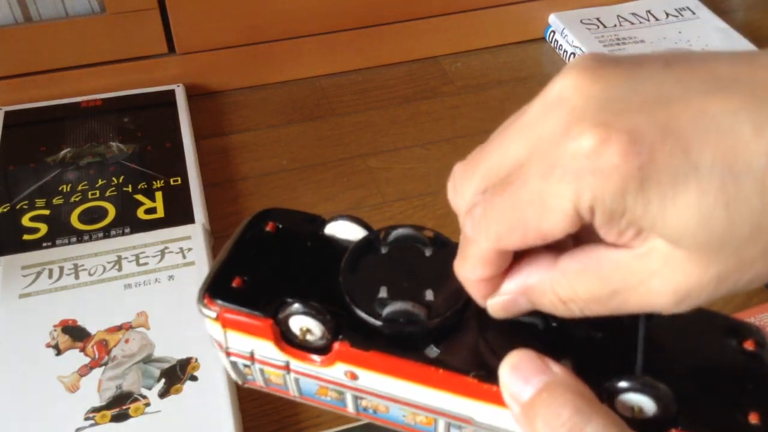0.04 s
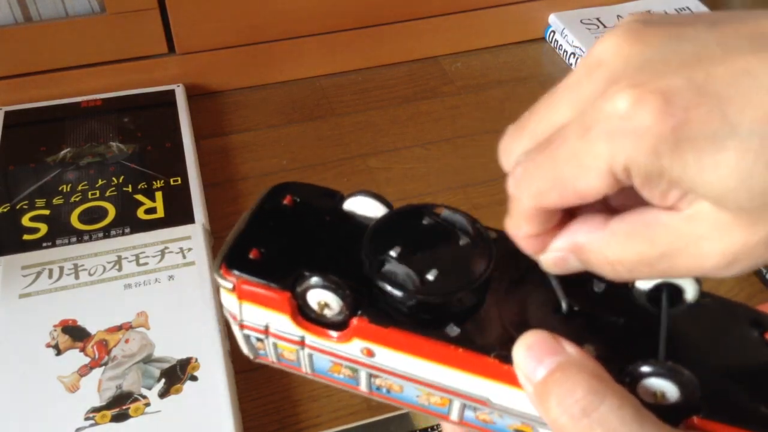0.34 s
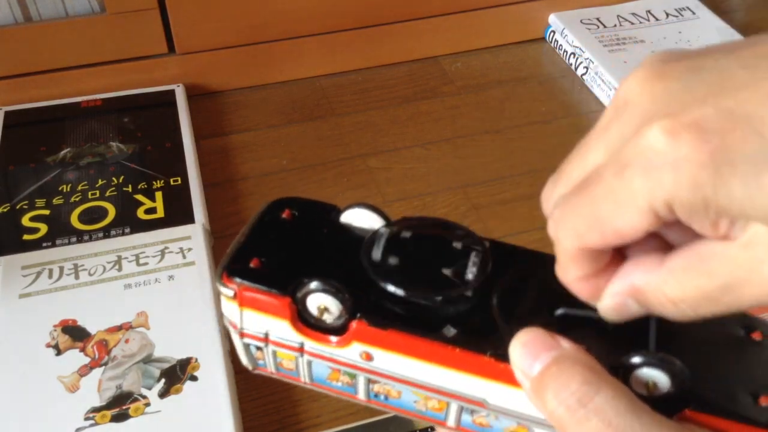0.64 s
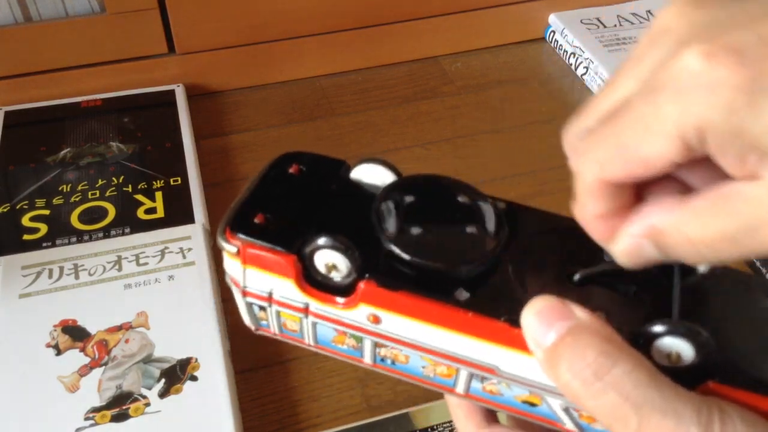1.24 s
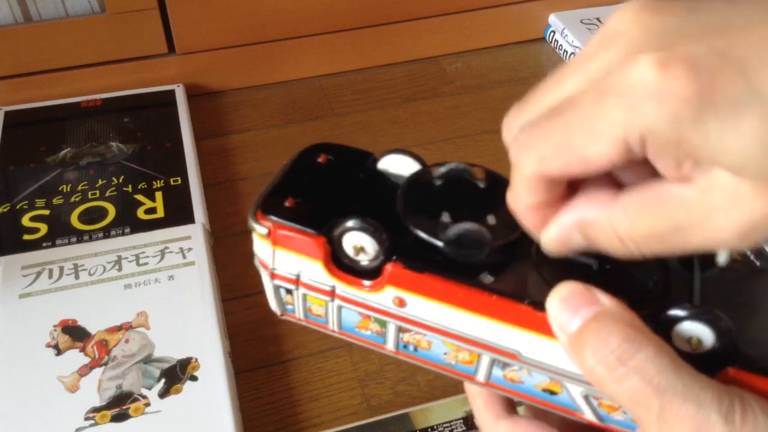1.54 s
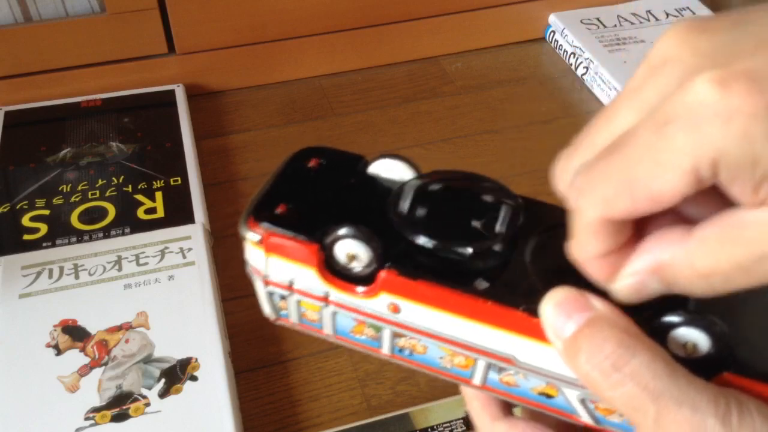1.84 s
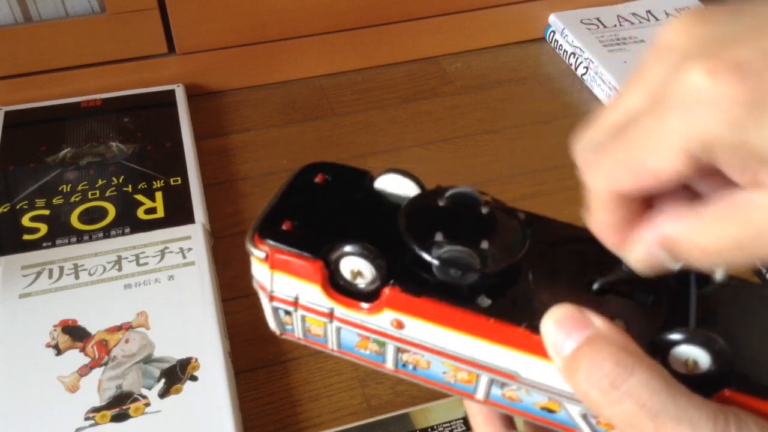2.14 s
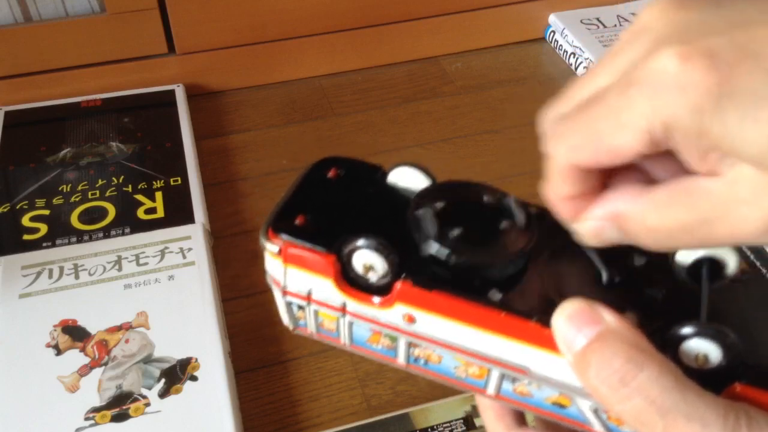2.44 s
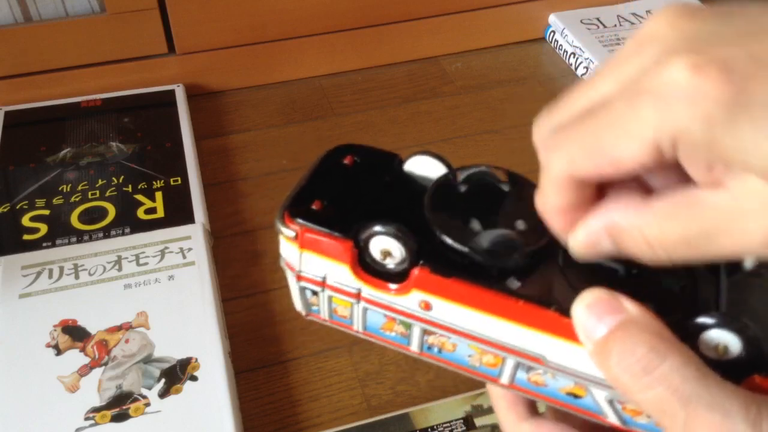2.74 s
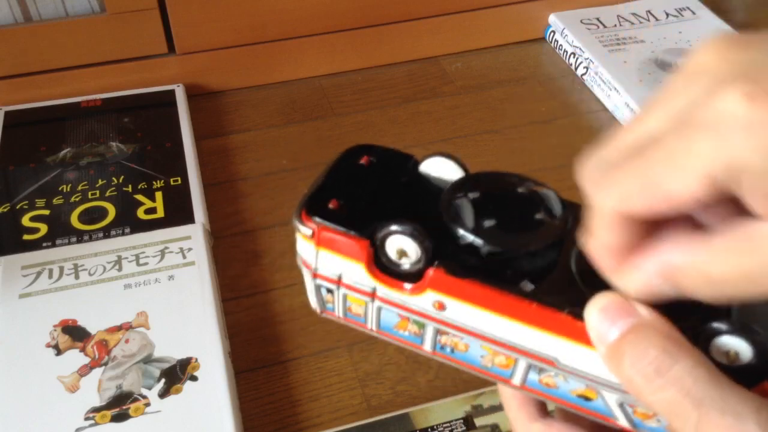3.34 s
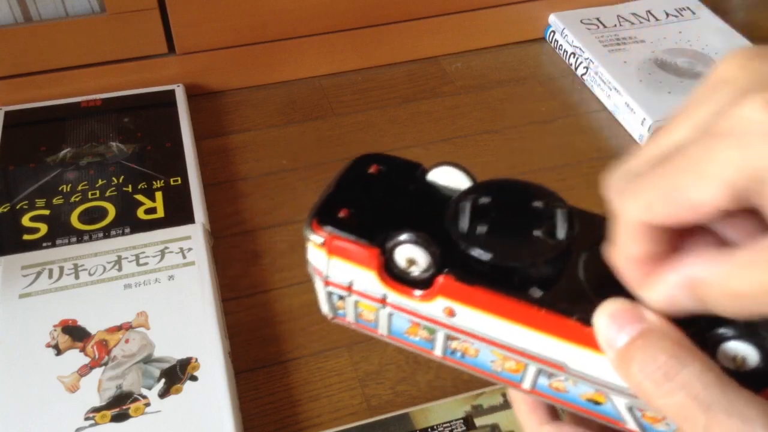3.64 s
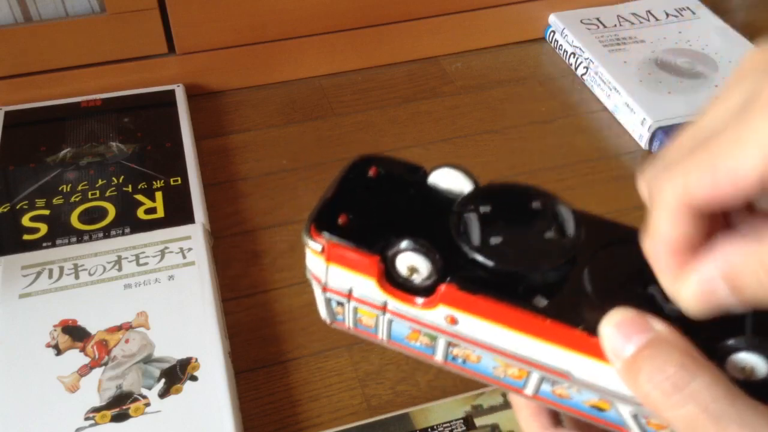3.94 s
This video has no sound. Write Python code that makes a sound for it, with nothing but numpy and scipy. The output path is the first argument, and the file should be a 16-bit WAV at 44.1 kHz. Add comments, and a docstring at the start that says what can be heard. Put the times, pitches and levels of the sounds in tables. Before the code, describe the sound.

A tin toy bus is cranked, its gears whirring faster and louder with a metallic rasp.

```python
"""A small room, close up: a hand crank winds up the flywheel of a tin toy bus.
Gear teeth tick faster and faster into the tin shell, from a quiet purr with a few clacks to a loud
grinding whir. An off-centre gear binds and rasps once a turn, the panels' ring swells with the crank,
and hollow knocks come from the floor pan. A thin whine climbs with the speed.
Behind the toy sit a short, faint reverb and a low room tone."""
import sys
import numpy as np
from scipy import signal
from scipy.fft import rfft, irfft
from scipy.io import wavfile

SR = 44100
rng = np.random.default_rng(int(sys.argv[2]) if len(sys.argv) > 2 else 0)


def digitize_waveform(pressure):
    """Quantize a signal to 16-bit integers and store it at the path in sys.argv[1].

    Rows of a 2-D input are taken as channels; values are limited to [-1, 1].
    """
    field = np.atleast_2d(pressure).T
    bounded = np.clip(field, -1, 1)
    quanta = np.round(bounded * 32767).astype(np.int16)
    wavfile.write(sys.argv[1], SR, quanta)


N = 176400
T = np.arange(N) / SR


# Wind-up of the gear train, as tooth contacts per second: t/s, f/Hz
TOOTH_RATE = [(0.0, 90.0), (0.2, 120.0), (0.35, 184.0), (0.55, 276.0), (0.75, 344.0), (1.0, 412.0),
              (1.3, 497.0), (1.7, 581.0), (2.2, 686.0), (2.6, 748.0), (3.0, 797.0), (3.4, 841.0),
              (4.0, 889.0)]

def gear_train(gear_teeth=42, turns_per_crank=6.5):
    """The drive behind the toy: tooth rate, and running counts of teeth, gear turns and crank turns."""
    mesh_hz = curve(TOOTH_RATE)
    teeth = np.cumsum(mesh_hz) / SR
    turns = teeth / gear_teeth
    return mesh_hz, teeth, turns + 0.25, turns / turns_per_crank - 0.17


def tooth_ticks(mesh_hz, teeth, jitter_teeth=.13, spread_db=2.5, bounces_per_tooth=2.2):
    """One uneven tick per tooth, with softer random bounces between; equal power at any speed."""
    number = np.arange(1, int(teeth[-1]))
    late, strength = rng.standard_normal((len(number), 2)).T
    onsets = np.minimum(np.searchsorted(teeth, number + jitter_teeth * late), N - 1)
    ticks = np.zeros(N)
    ticks[onsets] = from_db(spread_db * np.clip(strength, -2, 2))
    bounces = (rng.random(N) < bounces_per_tooth * mesh_hz / SR) * rng.standard_normal(N)
    return rms_one((ticks + from_db(-7) * bounces) / np.sqrt(mesh_hz))


# Grind envelope between surges: t/s, level/dB
GRIND_LEVEL = [(0, -43), (.1, -36), (.2, -33), (.3, -32.5), (.42, -32.5), (.57, -30), (.75, -30),
               (.83, -31), (.93, -31), (.98, -28), (1.1, -25), (1.19, -27), (1.3, -25), (1.48, -26),
               (1.56, -23), (1.6, -21), (1.68, -22), (1.75, -22.5), (1.85, -22.5), (1.95, -22),
               (2.1, -21.5), (2.62, -20), (2.7, -22), (2.8, -20), (3.4, -20), (4, -20)]

def grind(ticks, mesh_hz, surge, push, crank):
    """Teeth drive the shell and panels, digging in once a turn as the off-centre gear binds."""
    binding = np.clip((mesh_hz - 140) / 232, 0, 1)  # a slow gear does not bind yet
    depth = (mesh_hz / 800) ** -1.57 + 0.21 * push  # evens out with speed, deepens on a push
    surge_db = 1.86 * surge * binding * depth
    contacts = from_db(curve(GRIND_LEVEL) + 0.12 * drift(36)) * ticks
    body = shell(contacts * from_db(surge_db + .5 * push))
    return brightness(body + panels(contacts, surge_db, crank), surge_db)


# Broad tone colour of the tin shell: f/Hz, level/dB
SHELL_EQ = [(60, -23), (110, -19.5), (170, -16.5), (250, -18.5), (380, -15), (520, -10), (800, -5),
            (1150, -1.5), (1500, 0), (2300, -1.5), (3100, -5.5), (3700, 0.5), (4500, 1.5), (5300, -1),
            (5800, 1.5), (7500, -1.5), (9000, -4), (11700, -1), (13000, 2.5), (15300, 0)]

def shell(contacts, places=10):
    """Contacts reach the shell at several places, each with a ring of its own."""
    place = rng.integers(0, places, N)
    rings = sum(signal.fftconvolve(contacts * (place == k), tin_hit(t60=0.047, ring_db=17.5))[:N]
                for k in range(places))
    return from_db(-1) * colour(rings, SHELL_EQ)


# Panel resonances: f/Hz, width/Hz, level/dB, share of the surge, swing/dB, crank phase of the swing/turns
# (loudest at that phase if the swing is positive, quietest if negative)
PANEL_MODES = [(239, 75, -27.5, -1.26, -0.5, -0.31), (516.5, 108, -21.5, -0.3, 1.5, 0.33),
               (713, 100, -23, 2.02, 4, 0.24), (828, 69, -20, -0.34, 3, -0.019),
               (1032, 36, -25, -0.8, -1.5, -0.12), (1418, 118, -17.5, 1.26, 2, 0.34),
               (1764, 88, -15, 1.06, 1, -0.16), (2061, 33, -21.5, 1.1, 2, -0.15),
               (2588, 162, -13.5, 0.95, 0.5, -0.065), (3480, 71, -22, 2, -2, 0),
               (4040, 110, -29, 2.24, 12.5, 0.29), (4824, 100, -19, 1.7, 4, 0.34),
               (5053, 70, -23.5, 1.5, 6, 0.63), (6970, 210, -19.5, -4.5, 10, 0.34),
               (7170, 170, -18, 1, 4.5, 0.31), (8440, 2300, -6.5, -0.9, 1.5, -0.17),
               (12830, 79, -23, 2.1, 6, 0.17)]

def panels(contacts, surge_db, crank):
    """Each panel's ring swells and dips once per crank turn, and flickers a little by itself."""
    out = 0
    for hz, width_hz, db, share, swing_db, swing_phase in PANEL_MODES:
        crank_db = swing_db * np.cos(2 * np.pi * (crank - swing_phase))
        level_db = db + share * surge_db + crank_db + 2.08 * drift(17)
        ring = resonate(contacts * rng.choice([-1, 1], N) * from_db(level_db), hz, width_hz)
        octave_band = [hz / np.sqrt(2), min(hz * np.sqrt(2), SR / 2 - 1)]
        out = out + butter_filter(ring, 1, octave_band, "band")
    return out


# Treble shelf on the grind: t/s, level/dB
GRIND_TREBLE = [(0, -36), (.17, -48), (.25, -10), (.42, -9), (.6, -4.5), (.8, -1.5), (1, 1.5), (2, 0.5),
                (4, 2.5)]

def brightness(tin, surge_db):
    """The grind opens from dull to bright; harder contacts add edge, and the treble flickers."""
    return shelf(tin, curve(GRIND_TREBLE) + 0.054 * surge_db + 0.87 * drift(31))


# Envelope of the rasp's peaks: t/s, level/dB
RASP_LEVEL = [(0, -90), (.6, -48), (.77, -36), (.88, -25), (1.0, -23), (1.15, -29.5), (2.0, -26.5),
              (2.6, -24), (4, -24)]
# Ring of the steel gear: f/Hz, width/Hz, level/dB
STEEL_MODES = [(3483, 61, -11.5), (5700, 220, -10), (6400, 200, -13), (10080, 100, -8), (10670, 410, -2.5),
               (13500, 590, -8.5)]

def rasp(ticks, gear, push):
    """Once a turn the gear binds and its steel rings brightly, louder on a push."""
    gain = from_db(curve(RASP_LEVEL) + 3 * push)
    return ring_modes(ticks * once_per_turn(gear, sharpness=1.77) * gain, STEEL_MODES)


# Whine envelope: t/s, level/dB
WHINE_LEVEL = [(0, -61), (.2, -62), (.3, -75), (.43, -55), (.6, -59), (.9, -57), (1.2, -65), (1.3, -35.5),
               (1.4, -50.5), (2, -51), (2.25, -35), (2.45, -40.5), (2.62, -34), (2.75, -40), (3, -39),
               (3.2, -36), (3.55, -35.5), (3.72, -39), (3.8, -32), (3.89, -31.5), (3.96, -54)]

def whine(teeth, mesh_hz, surge, push, pitch_wander=0.0075, flutter_db=2):
    """The tooth rate sings as a fluttering tone and its octave, swelling with each surge and push."""
    phase = 2 * np.pi * (teeth + np.cumsum(pitch_wander * mesh_hz * drift(44)) / SR)
    fundamental = from_db(flutter_db * drift(35)) * np.sin(phase)
    octave = from_db(-1.5 + flutter_db * drift(40)) * np.sin(2 * phase)
    return from_db(curve(WHINE_LEVEL) + 5.5 * surge + 2 * push) * (fundamental + octave)


# Hits of slack teeth: t/s, level/dB, treble/dB
SLACK_HITS = [(0.201, 3.5, -10), (0.22, -20, 11), (0.2484, 0, 0), (0.271, -2, 2), (0.294, -1.5, 2),
              (.302, 9.5, -26), (.315, -2, -3), (0.3637, 7, -16), (.370, 7.5, -24), (0.481, -7, 9.5),
              (.497, 9.5, -3), (0.63, -7, 3), (0.658, 12, -8.5), (3.788, -1, 11.5)]

def clacks():
    """Hard clacks through the shell as the gears take up slack, topped by the steel gear's zing."""
    hits = np.zeros(N + SR)
    for onset_s, db, treble_db in SLACK_HITS:
        hit = from_db(db) * shelf(tin_hit(t60=0.073, ring_db=11.5), treble_db)
        start = int(onset_s * SR)
        hits[start:start + len(hit)] += hit
    zing = from_db(-13) * resonate(hits[:N], hz=10800, width_hz=380)
    return colour(hits[:N], SHELL_EQ) + zing


# Knocks on the floor pan: t/s, level/dB
PAN_HITS = [(1.105, -45.5), (1.744, -47), (2.069, -42), (2.13, -41), (2.49, -43), (2.553, -44),
            (2.826, -40), (2.876, -40), (2.935, -48), (3.148, -40.5), (3.2, -44), (3.249, -42),
            (3.503, -39.5), (3.55, -40), (3.793, -41), (3.84, -42), (3.885, -42)]
# Hollow ring of the pan: f/Hz, width/Hz, level/dB
PAN_RING = [(837, 44, -6), (899, 63, -12.5), (987.5, 30.4, -3.5)]

def floor_pan(ticks, knock_s=0.026):
    """The binding gear hammers the floor pan: short bursts of ticks make hollow, rattling knocks."""
    out = np.zeros(N)
    for centre_s, db in PAN_HITS:
        near = np.abs(T - centre_s) < 2 * knock_s
        swell = np.cos(np.pi * np.clip((T[near] - centre_s) / knock_s, -.5, .5)) ** 2
        out[near] += 2 * from_db(db) * rms_one(ring_modes(ticks[near] * swell, PAN_RING))
    return butter_filter(out, 2, [650, 1250], "band")


def room_response(delay_s=.005):
    """The near walls answer with a short, faint tail."""
    return np.r_[np.zeros(int(delay_s * SR)), from_db(-11.5) * tail(t60=0.33)]


# Colour of the room tone: f/Hz, level/dB
ROOM_TONE_EQ = [(30, -21), (100, -16), (200, -1.5), (1000, 2.5), (2200, -4.5), (4000, -18), (15000, -13)]

def room_tone():
    """A quiet, steady bed of midrange noise."""
    return from_db(-53) * colour(rng.standard_normal(N), ROOM_TONE_EQ)


def tin_hit(t60, ring_db):
    """A sharp tick followed by the ring of thin sheet metal, unit energy."""
    hit = from_db(ring_db) * tail(t60)
    hit[0] += 1
    return hit / np.linalg.norm(hit)


def tail(t60):
    """A wash of dense modes falling 60 dB in t60 seconds, unit energy."""
    wash = rng.standard_normal(SR // 2) * from_db(-60 * T[:SR // 2] / t60)
    return wash / np.linalg.norm(wash)


def ring_modes(drive, modes):
    """Contacts excite each mode with random signs of its own."""
    return sum(from_db(db) * resonate(drive * rng.choice([-1, 1], len(drive)), hz, width_hz)
               for hz, width_hz, db in modes)


def resonate(x, hz, width_hz):
    """One resonance of unit power gain."""
    r = np.exp(-np.pi * width_hz / SR)
    feedback = [1, -2 * r * np.cos(2 * np.pi * hz / SR), r * r]
    return signal.lfilter(np.sqrt((1 - r * r) / 2) * np.array([1, 0, -1]), feedback, x)


def colour(x, points, size=4096):
    """Minimum-phase EQ of unit power gain through (f/Hz, level/dB) points."""
    hz, db = np.transpose(points)
    bin_hz = np.arange(size // 2 + 1) * SR / size
    gain = rms_one(from_db(np.interp(np.log(bin_hz + 1), np.log(hz), db)))
    cepstrum = irfft(np.log(gain))[:size // 2]
    causal = np.r_[cepstrum[0], 2 * cepstrum[1:]]
    return signal.fftconvolve(x, irfft(np.exp(rfft(causal, size))))[:N]


def shelf(x, treble_db, corner_hz=1500):
    """Raise or lower the treble."""
    low = butter_filter(x, 1, corner_hz, "low")
    return low + from_db(treble_db) * (x - low)


def butter_filter(x, order, hz, kind):
    """A smooth low, high or band pass."""
    return signal.sosfilt(signal.butter(order, hz, kind, fs=SR, output="sos"), x)


def once_per_turn(turns, sharpness):
    """A smooth bump from 0 to 1 at every whole turn."""
    return np.abs(np.cos(np.pi * turns)) ** (2 * sharpness)


def drift(rate_hz):
    """Slow random wander of spread 1."""
    r = np.exp(-80 * np.pi * rate_hz / SR)
    noise = rng.standard_normal(N // 40 + 2002)  # one value per 40 samples, plus a run-in
    slow = signal.lfilter([1], [1, -2 * r, r * r], noise)[2000:]
    return np.interp(np.arange(N) / 40, np.arange(len(slow)), rms_one(slow))


def curve(rows):
    """Join (t/s, value) rows by straight lines."""
    return np.interp(T, *np.transpose(rows))


def from_db(db):
    """Decibels to gain."""
    return 10 ** (np.asarray(db) / 20)


def rms_one(x):
    """Scale to unit rms."""
    return x / np.sqrt(np.mean(x ** 2) + 1e-20)


def scene():
    """Mix the toy's layers over the room; both channels carry the same sound."""
    slack, room, bed = clacks(), room_response(), room_tone()
    mesh_hz, teeth, gear, crank = gear_train()
    surge = once_per_turn(gear, sharpness=2.8)
    push = np.cos(2 * np.pi * crank)  # the hand pushes once per crank turn
    tone = whine(teeth, mesh_hz, surge, push)
    ticks = tooth_ticks(mesh_hz, teeth)
    whir = grind(ticks, mesh_hz, surge, push, crank)
    toy = whir + rasp(ticks, gear, push) + floor_pan(ticks) + tone + slack
    toy = butter_filter(toy, 5, 173, "high")  # the small shell cannot radiate bass
    reverb = signal.fftconvolve(toy, room)[:N]
    return np.tile(toy + reverb + bed, (2, 1))


def record(dry, cutoff_hz=15350):
    """A steep high cut takes off the very top."""
    return signal.sosfilt(signal.ellip(12, .1, 80, cutoff_hz, fs=SR, output="sos"), dry)


dry = scene()
out = record(dry)
digitize_waveform(out)
```